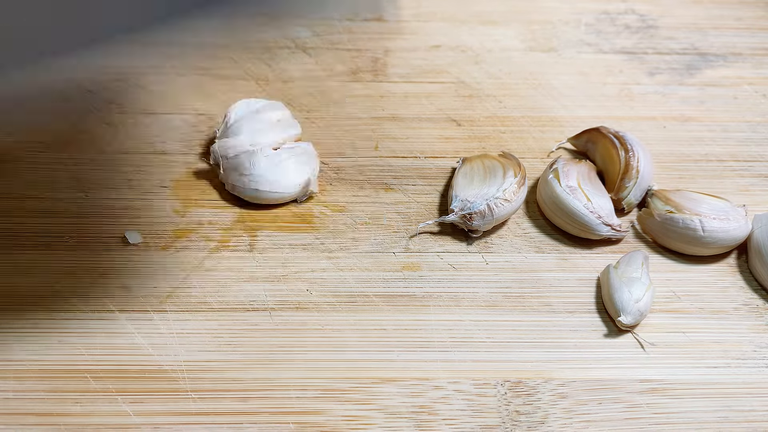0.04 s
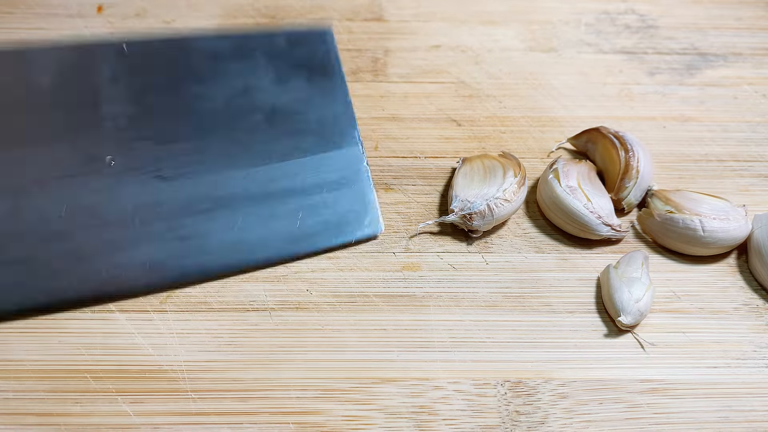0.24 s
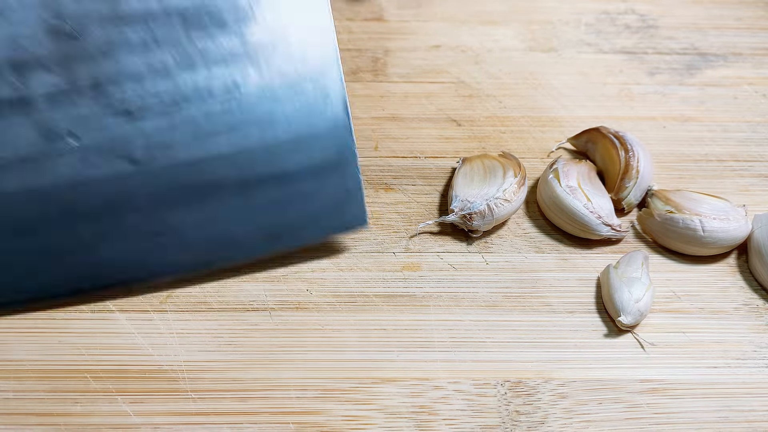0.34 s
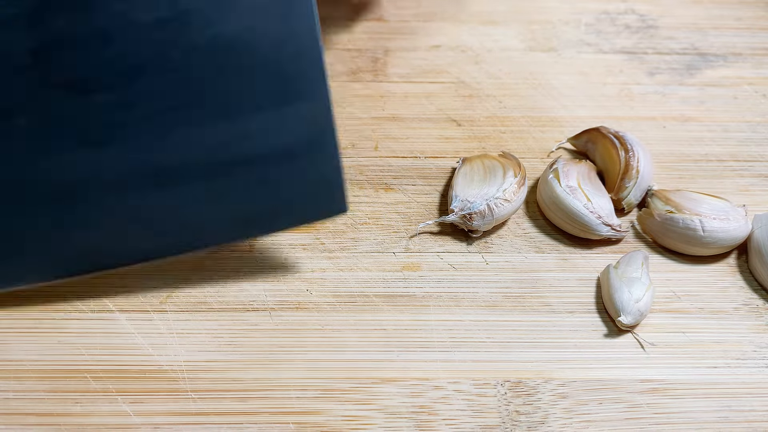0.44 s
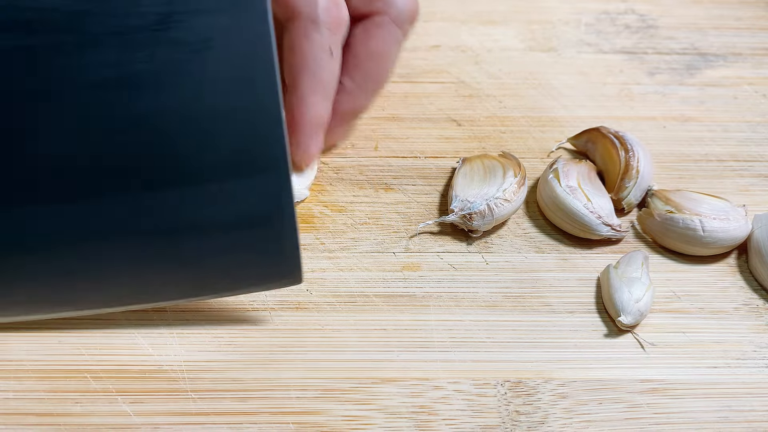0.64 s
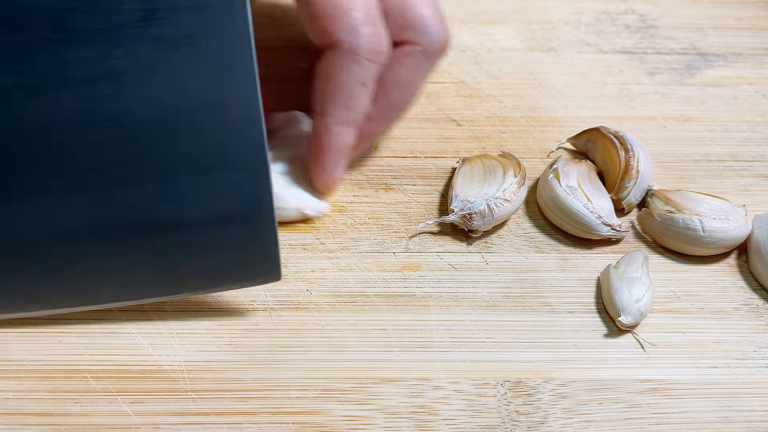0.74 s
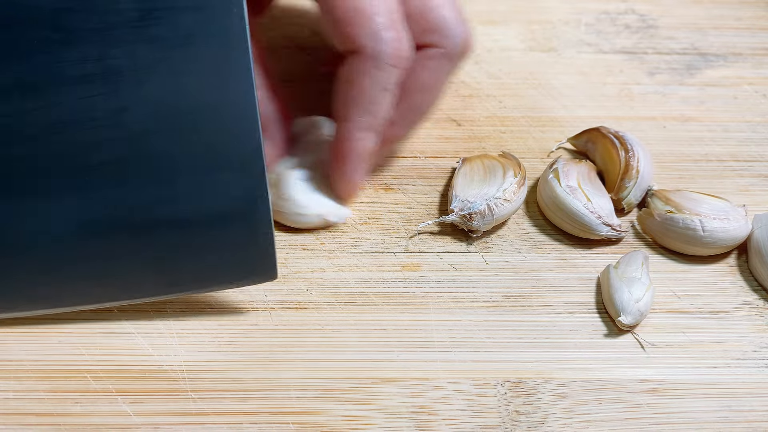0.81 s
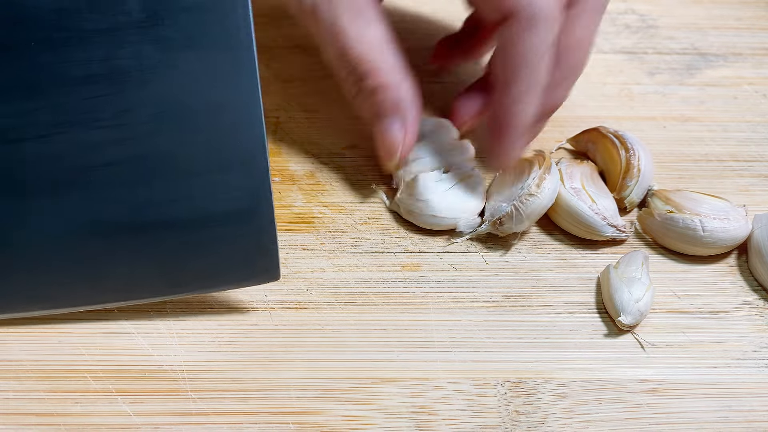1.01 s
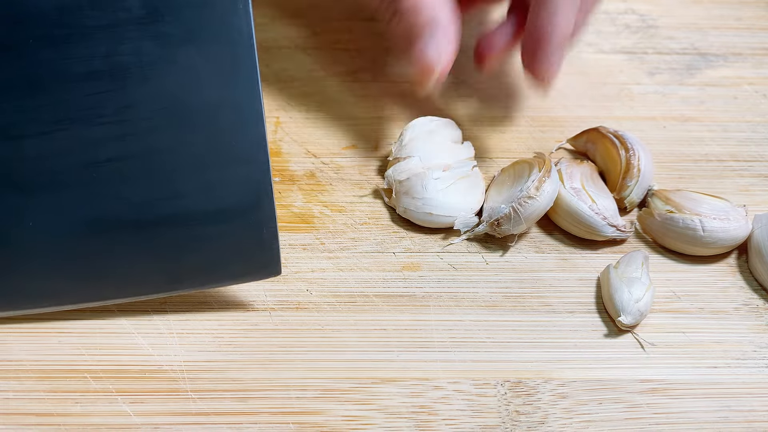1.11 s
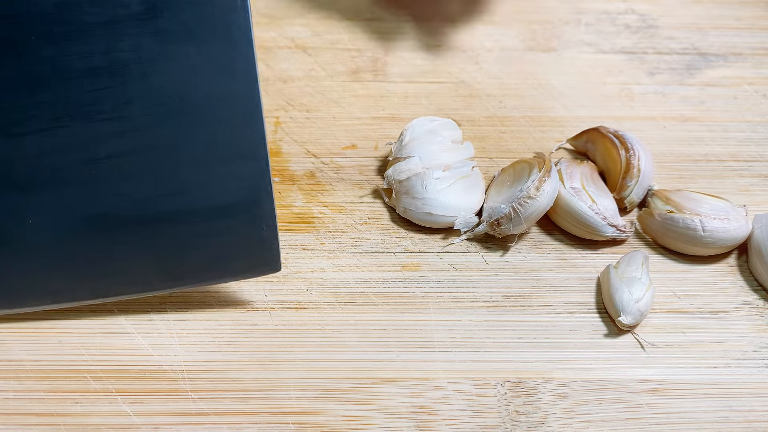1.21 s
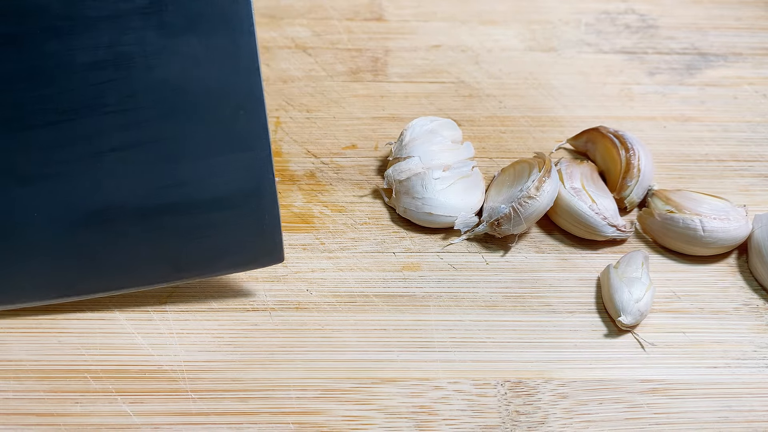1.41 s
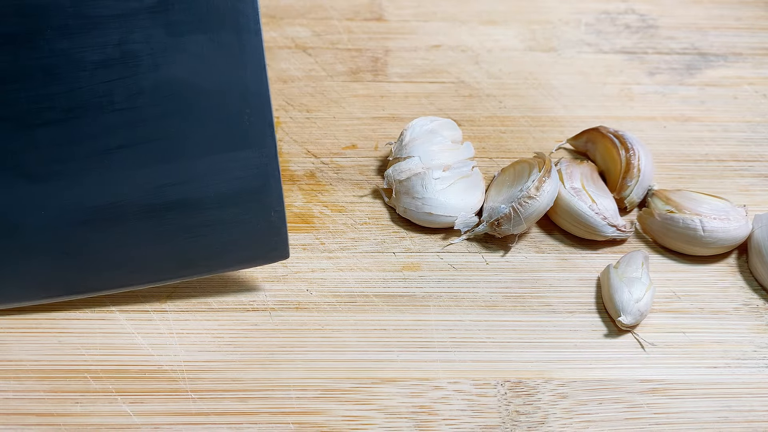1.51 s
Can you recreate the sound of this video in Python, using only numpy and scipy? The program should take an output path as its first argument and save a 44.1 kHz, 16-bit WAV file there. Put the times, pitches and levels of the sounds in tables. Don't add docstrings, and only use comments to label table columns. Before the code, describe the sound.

One loud, sharp smack of a cleaver's flat on garlic and a wooden board, with crunch and low thump; the blade knocks back lightly, then fingers faintly rustle papery skin. Close microphone, small quiet kitchen.

```python
import sys
import numpy as np
from scipy import signal
from scipy.fft import rfft, irfft, next_fast_len
from scipy.io import wavfile
from scipy.ndimage import uniform_filter1d, map_coordinates

SR = 44100
rng = np.random.default_rng(int(sys.argv[2]) if len(sys.argv) > 2 else 0)


def volts_from_db(level):
    exponent = np.asarray(level, float) / 20
    return 10 ** exponent


def bounce(signal):
    frames = np.transpose(np.atleast_2d(signal))
    limited = np.clip(frames, -1, 1)
    pcm = np.round(limited * 32767).astype(np.int16)
    wavfile.write(sys.argv[1], SR, pcm)


N = 68355
T = np.arange(N) / SR

# (frequency [Hz], density [dB per Hz])
AIR = [(15, -42.5), (25, -8.5), (114, 0.5), (249, -22.5), (301, -8), (363, -24.5), (1370, -22), (2690, -40),
       (16000, -57.5)]
AIR_DB = -65
# (frequency [Hz], level [dB rms])
HUM = [(281, -79), (197, -84)]

# (frequency [Hz], width [Hz], level [dB])
BOOM = [(69, 33, -6), (126.3, 19, 1.5), (217, 41, -3.5), (297.6, 13, -8.5), (414, 150, -15)]
# (time [s], level [dB], t60 [s])
SHAKES = [
    (-.05, -37.5, 0.59),
    (.13, -32, 0.71),
    (.33, -42.5, 0.6),
    (.62, -59.5, 1),
]
BOOM_LONG_DB, BOOM_LONG_S = -57, 6.5

# (time [s], level [dB], t60 [s])
RATTLES = [
    (-.05, -61.5, 0.69),
    (.128, -30, 0.41),
    (.313, -37.5, 0.261),
]
# (frequency [Hz], density [dB per Hz])
DEBRIS = [(250, -14.5), (500, -0.5), (1000, 0), (2500, 2), (3400, -8), (5000, -7.5), (8000, -14.5),
          (13000, -26.5)]
# (frequency [Hz], width [Hz], level [dB])
SETTLE = [(1050, 120, 2), (2252, 300, 0), (2710, 200, 3.5), (3520, 200, 4.5)]
CRUNCH_DB = 2.5

# (frequency [Hz], width [Hz], level [dB])
SPLIT = [(1806, 130, 2), (2620, 150, 1.5), (4170, 260, -5.5), (5570, 840, -14), (6734, 600, -10.5)]
CRUSH_S, CRUSH_DB, CRUSH_RISE_DB_PER_S = .1255, -25, 1050

# (time [s], clack [dB], thump [dB], blade ring [dB], clack length [s])
BLOWS = [
    (0.1255, -5.5, -38.5, -32, .001),
    (0.1267, -2.5, -4.5, -17.5, .0014),
]
# (time [s], knock [dB], thump [dB], blade ring [dB], knock length [s])
TAPS = [
    (0.1462, -29.5, -34, -37.5, 0.001),
    (.156, -20.5, -33, -43, 0.0034),
    (0.31, -19, -42.5, -30, 0.0021),
    (0.3117, -13.5, -43, -62, 0.00063),
    (0.3161, -25, -41, -76, 0.0029),
    (0.3266, -14.5, -33.5, -33.5, 0.00055),
    (0.338, -27.5, -41, -44, 0.0035),
    (.388, -74, -33, -68, 0.0017),
]
# (frequency [Hz], width [Hz], level [dB])
HEEL = [(1447.7, 130, -5), (3680, 350, 2), (5080, 960, -9), (6770, 1800, -5), (9130, 3100, -7.5),
        (12250, 940, -12.5), (14800, 1200, -20)]
# (frequency [Hz], width [Hz], level [dB])
CLACK = [(450, 240, -11.5), (849, 200, -10), (1450, 350, 1.5), (2003.5, 680, -4), (2800, 350, -2),
         (3460, 260, -1.5), (4850, 530, -11.5), (7700, 810, -13), (13500, 2000, -25.5)]
# (frequency [Hz], width [Hz], level [dB])
KNOCK = [(439, 32, -2.5), (828.2, 82, -6), (1433.7, 120, 3.5), (1865, 200, -1), (2160, 300, -9),
         (2740, 270, -4), (4200, 530, -13.5), (6100, 1400, -20), (12620, 2500, -36.5)]
# (frequency [Hz], level [dB], t60 [s])
BOARD = [(70.24, -15.5, 0.57), (123, -18, 0.23), (207, 4.5, 0.041), (225.5, -15, 0.42), (329, -3, 0.024),
         (441.3, -10, 0.021), (441.5, -23, .16), (520, -26, 0.1), (151.5, -21.5, .2)]
# (frequency [Hz], level [dB], t60 [s])
BLADE = [(913, -22, 0.3), (1890, 3, 0.14), (2358, -15, 0.13), (2684, -14.5, 0.15), (3400, -21.5, .2),
         (3542, -16.5, 0.092), (5090, -28.5, .2), (7470, -20.5, 0.07)]
# (time [s], level [dB])
NUDGES = [(.655, -57.5), (.857, -54.5), (.925, -58.5), (1.046, -68), (1.453, -58.5), (1.4566, -48),
          (1.463, -58), (1.513, -55.5)]
# (frequency [Hz], width [Hz], level [dB])
CLOVE = [(539.8, 230, -7.5), (863, 170, -2.5), (1380, 340, -0.5), (2440, 700, -8)]
HARD_HZ, FLAT_HZ, SOFT_HZ, CLOVE_HZ = 14200, 6000, 2500, 1188
PUSH = 3
SPREAD = 1
THUMP_LAG_S, THUMP_CUT_HZ = .0016, 200
GRIP = .72
SHIMMER_DB = 5.5

# (time [s], level [dB], length [s])
SHOVE = [
    (0.129, -26, .006),
    (.33, -42, .01),
]

# (time [s], level [dB])
SLIDE = [(0.451, -88), (.70, -77.5), (0.741, -67), (.86, -66), (.93, -68.5), (.99, -64.5), (1.05, -67),
         (1.064, -83), (1.13, -98)]
# (frequency [Hz], density [dB per Hz])
SKIN = [(300, -18), (1050, -11.5), (1800, -13.5), (2600, -7.5), (3200, -8.5), (7200, -6), (9300, -6),
        (12800, -6.5)]
# (time [s], peak [dB], frequency [Hz])
SNAPS = [(.1275, -30.5, 15040), (0.3266, -42, 6500), (0.6869, -51.5, 6990), (0.7044, -50.5, 7350),
         (0.7346, -47, 4430), (.7801, -49.5, 12000), (.998, -61.5, 3770), (1.043, -44.5, 7800)]
LAST_RUB_S, LAST_RUB_DB = 1.538, -74.5
STIR_S, STIR_DB = 1.452, -86
PATCH_DB = 1.2
CRACKLES_PER_S, CRACKLE_DB = 140, 7

DRAW_S, DRAW_RISE_S, DRAW_FALL_S, DRAW_DB = 0.426, 0.11, 0.023, -57.5
SING_HZ = [1860, 3386, 4576, 4936, 6272, 7337, 10200, 11600]
# (width [Hz], level [dB])
SING = [(60.3, -15), (40, -4.5), (37.037, -5), (40, 1.5), (30, -0.5), (24.8, 4), (60, -6.5), (60, -29)]
# (frequency [Hz], width [Hz], level [dB])
SCRAPE = [(4000, 24000, -19.5), (12000, 4100, -26.5)]

# (time [s], length [s], level [dB], frequency [Hz])
RUBS = [(0.76, 0.037, -68.5, 2570), (0.826, .05, -69.5, 1030), (1.1, 0.031, -71, 2600),
        (.98, 0.039, -69, 3900), (1.457, .02, -74.5, 3670), (1.45, 0.014, -74, 860),
        (1.545, .008, -76.5, 3600), (1.318, .02, -78, 1540)]
RUB_Q, RUB_RISE = 6.34, 0.35

# (time [s], half length [s], frequency [Hz], width [Hz], level [dB])
WHISTLE = (1.26, .055, 5600, 400, -91)

# (frequency [Hz], t60 [s])
ROOM = [(150, 0.23), (500, 0.32), (2000, 0.38), (6000, 0.37), (13000, 0.34)]
# (frequency [Hz], level [dB])
WET = [(100, -17), (500, -9.5), (1500, -15.5), (3000, -12.5), (8000, -11.5), (12000, -14.5), (15000, -13.5)]
STEEL_WET_DB = -9

# (frequency [Hz], correlation [-1 to 1])
ALIKE = [(60, 0.98), (200, .93), (400, 0.35), (1300, 0.4), (2600, -.1), (5500, .15), (8500, .997),
         (14000, .982)]
# (frequency [Hz], lead [rad])
LEAD = [(2000, 0), (3800, -1.2), (7000, .5), (8300, np.pi), (10100, np.pi), (11000, 2 * np.pi),
        (13600, 2 * np.pi), (14800, 3 * np.pi)]
# (frequency [Hz], level [dB])
MIC = [(25, -4), (60, 1), (14000, 2), (15800, -2), (16200, -32)]
TOP = .95


def unit(x):
    return x / np.sqrt(np.mean(x ** 2) + 1e-20)


def along(points, hz):
    f, v = np.transpose(points)
    return np.interp(np.log(hz + 1), np.log(f + 1), v)


def filtered(x, response):
    m = next_fast_len(x.shape[-1] + SR // 2)
    return irfft(rfft(x, m) * response(np.fft.rfftfreq(m, 1 / SR)), m)[..., :x.shape[-1]]


def body(peaks):
    def response(f):
        return sum((-1) ** k * volts_from_db(db) * 1j * f * w / (c * c - f * f + 1j * f * w)
                   for k, (c, w, db) in enumerate(peaks))
    return response


def ring(modes, t, attack_s):
    sines = sum(volts_from_db(db - 60 * t / t60) * np.sin(2 * np.pi * hz * t) for hz, db, t60 in modes)
    return sines * (1 - np.exp(-t / attack_s))


def wobble(rate):
    knots = rng.standard_normal(int(N * rate / SR) + 4)
    return map_coordinates(knots, [T * rate], order=1)


def noise():
    return rng.standard_normal((2, N))


def add(out, s, x):
    part = out[..., round(s * SR):][..., :x.shape[-1]]
    part += x[..., :part.shape[-1]]


def fading(rows, rise_s):
    return sum(volts_from_db(db - 60 * (T - s) / t60) * np.clip((T - s) / rise_s, 0, 1) for s, db, t60 in rows)


def patchy(x, depth_db):
    z = signal.stft(x, nperseg=512)[2]
    field = uniform_filter1d(rng.standard_normal(z.shape[1:]), size=6, axis=0)
    field = uniform_filter1d(field, size=6, axis=1)
    return signal.istft(z * volts_from_db(depth_db * unit(field)), nperseg=512)[1][:, :N]


def still_air():
    return volts_from_db(AIR_DB + 1.5 * wobble(5.9)) * unit(filtered(noise(), lambda f: volts_from_db(along(AIR, f))))


def fridge():
    lines = [volts_from_db(db + 3.0 + 3.6 * wobble(3.6)) * np.sin(2 * np.pi * hz * T) for hz, db in HUM]
    return sum(lines) * [[1], [0]]


def worktop():
    level = fading(SHAKES, 0.019) + volts_from_db(BOOM_LONG_DB - 60 * T / BOOM_LONG_S)
    return level * unit(filtered(noise(), lambda f: body(BOOM)(f) ** 1.5))


def rattle():
    grains = patchy(noise(), 2.5) * volts_from_db(CRUNCH_DB * wobble(250))

    def colour(f):
        return volts_from_db(along(DEBRIS, f)) * (1 + np.abs(body(SETTLE)(f)))
    return fading(RATTLES, 0.0019) * unit(filtered(grains, colour))


def crush():
    climb_db = CRUSH_RISE_DB_PER_S * np.minimum(T - CRUSH_S, 0)
    swell = volts_from_db(CRUSH_DB + climb_db + 3 * wobble(500))
    swell = swell * (T < CRUSH_S) * np.clip((T - .1) / .006, 0, 1)
    return unit(filtered(noise(), lambda f: body(SPLIT)(f) / (1 + (f / 8000) ** 6))) * swell


def burst(peaks, length, db, edge_hz):
    t = T[:SR // 4]
    force = rng.standard_normal((2, len(t))) * (t / length) * np.exp(1 - (t / length) ** 2)
    force[:, round(length * SR / 2)] += PUSH * np.sqrt(length * SR) * (edge_hz < FLAT_HZ)
    x = filtered(force, lambda f: body(peaks)(f) / (1 + 1j * f / edge_hz) ** 2)
    return volts_from_db(db) * x / np.abs(x).max(axis=1, keepdims=True) * [[1], [SPREAD]]


def blade_ring(t):
    held = [(hz, db, GRIP * t60) for hz, db, t60 in BLADE]
    sides = [sum(ring([mode], t, 0.005) * volts_from_db(SHIMMER_DB * wobble(61)[:len(t)]) for mode in held)
             for _ in range(2)]
    return np.array(sides)


def blows():
    wood, blade, t = np.zeros((2, N)), np.zeros((2, N)), T[:SR // 2]
    thump = filtered(ring(BOARD, t, 0.00014), lambda f: (1j * f / (THUMP_CUT_HZ + 1j * f)) ** 2)
    contacts = ((HEEL, HARD_HZ, BLOWS[:1]), (CLACK, FLAT_HZ, BLOWS[1:]), (KNOCK, SOFT_HZ, TAPS))
    for face, edge_hz, rows in contacts:
        for s, clack_db, thump_db, ring_db, length in rows:
            add(wood, s - length / 2, burst(face, length, clack_db, edge_hz))
            add(wood, s + THUMP_LAG_S, volts_from_db(thump_db) * thump * [[1], [.8]])
            add(blade, s, volts_from_db(ring_db) * blade_ring(t))
    for s, db in NUDGES:
        add(wood, s, burst(CLOVE, 0.0014, db, CLOVE_HZ))
    return wood, blade


def bulb():
    s, db = np.transpose(SLIDE)
    level = volts_from_db(np.interp(T, s, db, left=-120, right=-120))
    level = level + volts_from_db(LAST_RUB_DB) * np.clip((T - LAST_RUB_S) / 0.0043, 0, 1)
    level = level + volts_from_db(STIR_DB) * (T > STIR_S)
    grains = patchy(noise(), PATCH_DB) * volts_from_db(1.1 * wobble(690) + 1.2 * wobble(49))
    ticks = (rng.random(N) < CRACKLES_PER_S / SR) * rng.random(N)
    ticks = filtered(ticks, lambda f: SR / (2000 + 2j * np.pi * f))
    grains = grains * (1 + volts_from_db(CRACKLE_DB) * ticks)
    out = volts_from_db(6.0) * level * unit(filtered(grains, lambda f: volts_from_db(along(SKIN, f))))
    t = T[:SR // 20]
    for s, db, hz in SNAPS:
        snap = rng.standard_normal((2, len(t))) * volts_from_db(-60 * t / 0.015)
        crack = filtered(snap, body([(hz, 1800, 0), (12500, 4000, -8), (1300, 900, -8)]))
        add(out, s, volts_from_db(db + 2.5) * crack / np.abs(crack).max())
    return out


def shove():
    pushes = [volts_from_db(db) * (T - s) / length * np.exp(-((T - s) / length) ** 2) for s, db, length in SHOVE]
    return sum(pushes) * [[1], [0]]


def draw():
    shape = np.exp(-((T - DRAW_S) / np.where(T < DRAW_S, DRAW_RISE_S, DRAW_FALL_S)) ** 2 / 2)
    steel = body([(hz, *line) for hz, line in zip(SING_HZ, SING)] + SCRAPE)
    return volts_from_db(DRAW_DB) * unit(filtered(noise() * shape, steel)) * np.sqrt(np.mean(shape ** 2))


def rubs():
    out = np.zeros((2, N))
    for s, length, db, hz in RUBS:
        shape = np.exp(-((T - s) / np.where(T < s, RUB_RISE * length, length)) ** 2)
        hiss = filtered(noise(), lambda f: body([(hz, hz / RUB_Q, 0)])(f) ** 2)
        out += volts_from_db(db) * shape * unit(hiss)
    return out


def whistle():
    s, half, hz, width, db = WHISTLE
    hiss = unit(filtered(noise(), lambda f: body([(hz, width, 0)])(f) ** 2))
    return volts_from_db(db) * np.exp(-((T - s) / half) ** 4) * hiss


def tail(seconds):
    hz, t, z = signal.stft(rng.standard_normal((2, round(seconds * SR))), SR, nperseg=256)
    x = signal.istft(z * volts_from_db(-60 * t / along(ROOM, hz)[:, None]), SR, nperseg=256)[1]
    return filtered(x / np.linalg.norm(x[0]), lambda f: volts_from_db(along(WET, f)))


def kitchen(x):
    late = np.pad(x[0], (300, 0))[None]
    return signal.fftconvolve(late, tail(0.96), axes=1)[:, :N]


def ports(pair):
    def share(f):
        turn = np.arccos(np.clip(along(ALIKE, f), -1, 1)) / 2
        return np.array([np.cos(turn), 1j * np.sin(turn)])

    def shift(f):
        return np.exp(.5j * np.outer([1, -1], along(LEAD, f))) * volts_from_db([[-.4], [.4]])
    mid, side = filtered(pair, share)
    return filtered(np.array([mid + side, mid - side]), shift)


def scene():
    wood, blade = blows()
    near = wood + crush() + rattle() + draw() + bulb() + rubs()
    room = kitchen(near + volts_from_db(STEEL_WET_DB) * blade)
    background = still_air() + fridge() + whistle()
    return ports(near + blade + room + worktop() + shove() + background)


def top_cut(x):
    return signal.sosfilt(signal.butter(12, 16170, fs=SR, output="sos"), x)


def record(dry):
    x = filtered(dry, lambda f: volts_from_db(along(MIC, f)))
    mix = x / (1 + np.abs(x / TOP) ** 6) ** (1 / 6)
    return top_cut(mix)


dry = scene()
out = record(dry)
bounce(out)
```